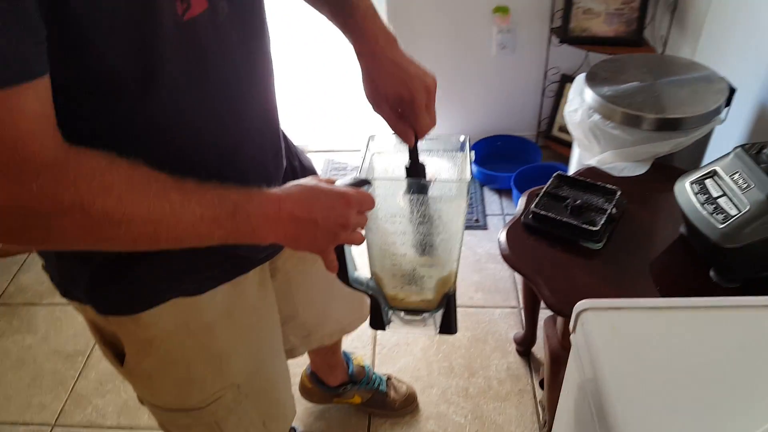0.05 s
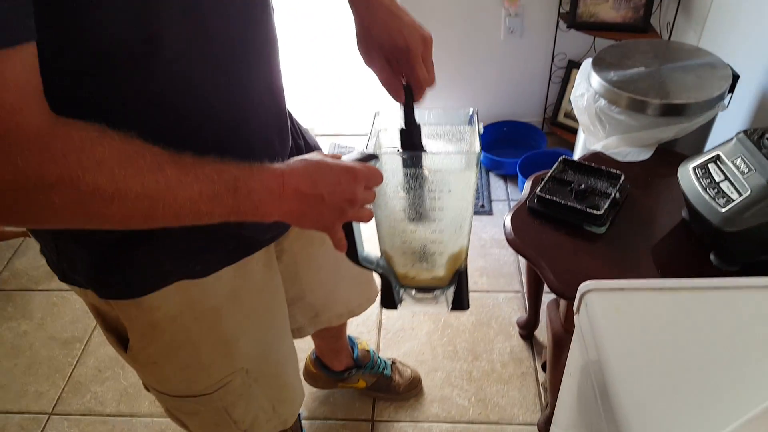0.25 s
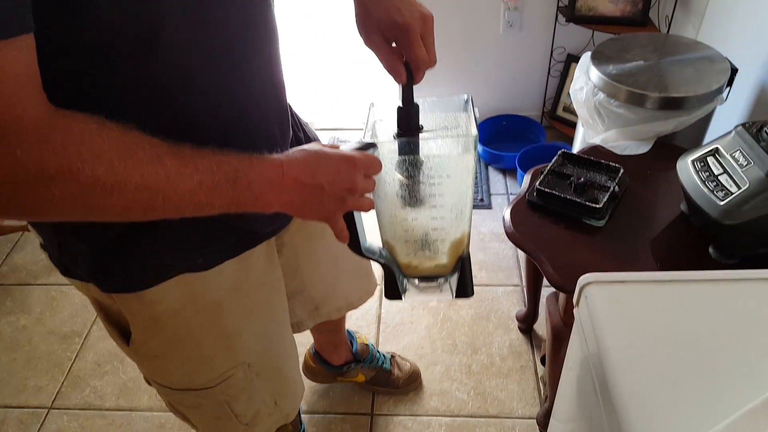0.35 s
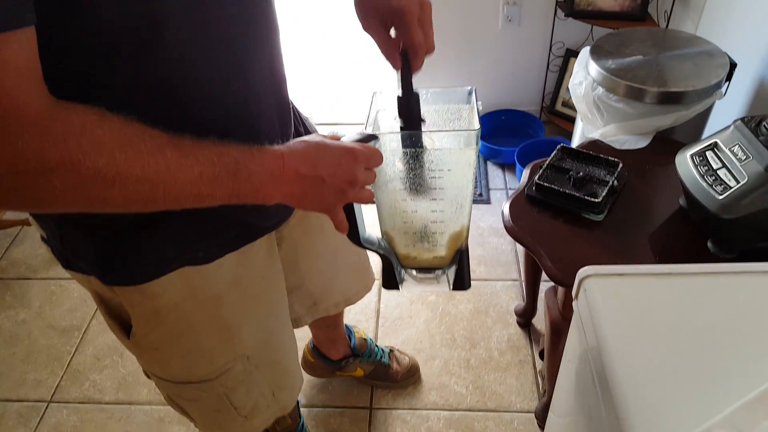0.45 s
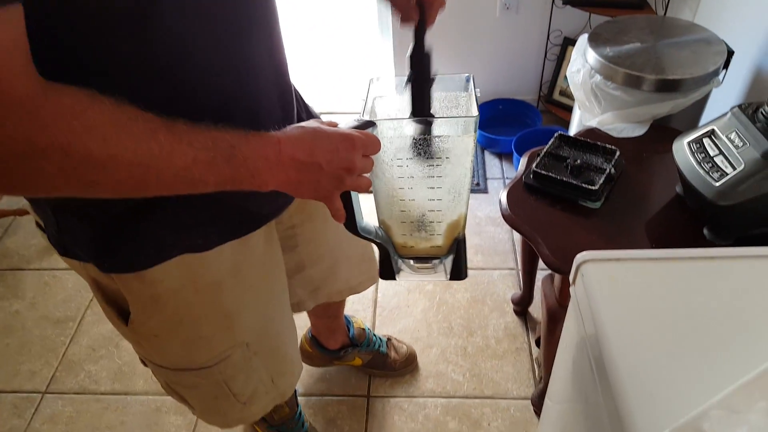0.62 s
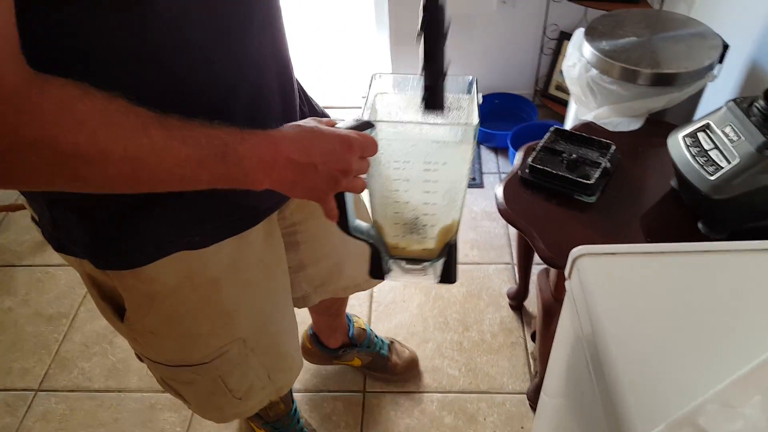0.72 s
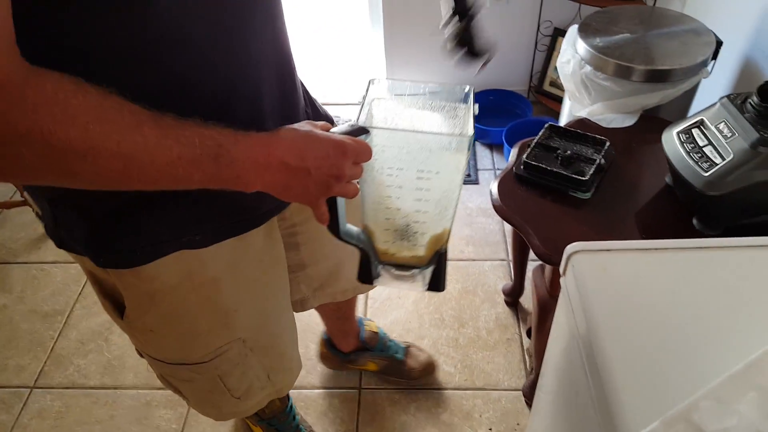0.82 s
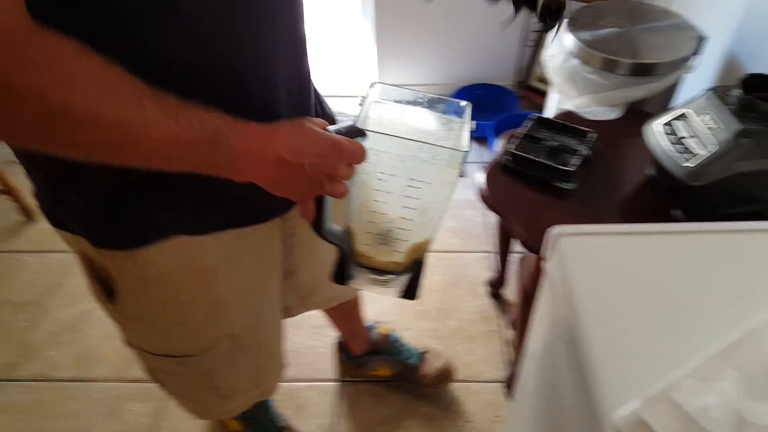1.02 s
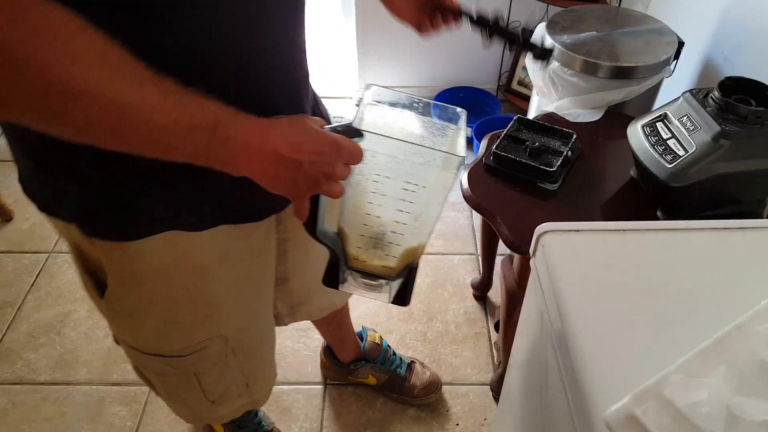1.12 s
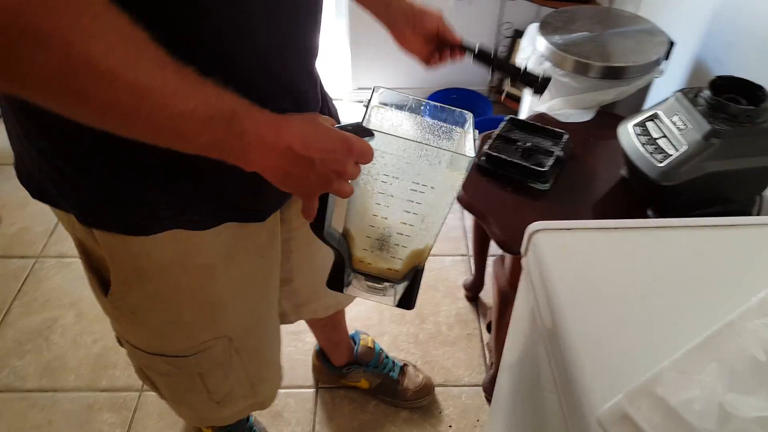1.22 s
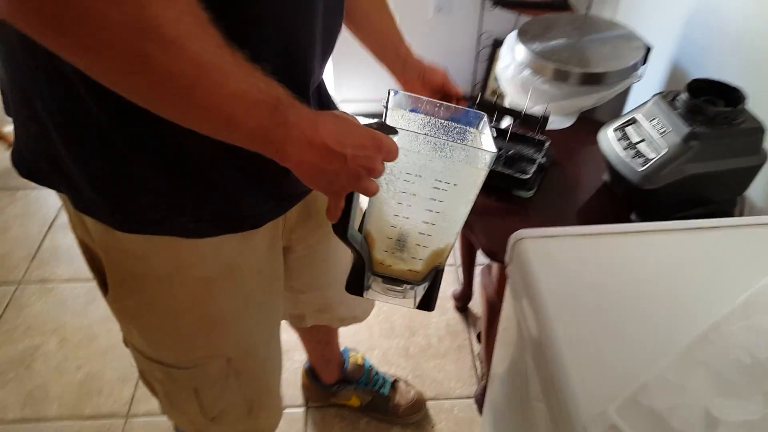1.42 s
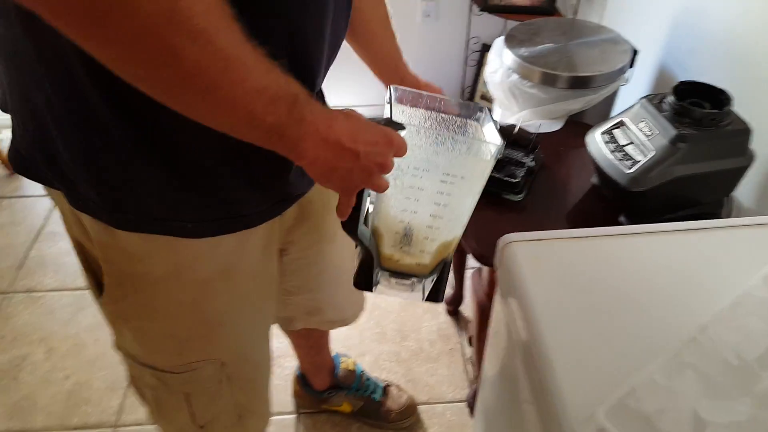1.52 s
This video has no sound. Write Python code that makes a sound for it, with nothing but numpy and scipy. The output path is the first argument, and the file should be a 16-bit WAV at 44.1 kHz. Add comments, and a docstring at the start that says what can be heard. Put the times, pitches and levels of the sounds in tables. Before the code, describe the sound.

Hollow plastic clacks as a blade shaft is pulled from a blender pitcher indoors.

```python
"""A plastic blade shaft knocks and scrapes its way up out of a blender pitcher in a tiled room.
Each contact clacks the walls and rings the hollow pitcher and the shaft; the room answers.
The arm swings the shaft aside with a faint rustle, the wet shaft hisses in the fingers,
and it touches down on a table. Dull room noise and microphone hiss lie underneath."""
import sys
import numpy as np
from scipy import signal
from scipy.fft import rfft, irfft
from scipy.io import wavfile

SR = 44100
rng = np.random.default_rng(int(sys.argv[2]) if len(sys.argv) > 2 else 0)


def unload_audio(sound):
    """Save the sound as a 16-bit wav file, at the path given as the first command line argument."""
    columns = np.transpose(np.atleast_2d(sound))
    # keep every value between -1 and 1, then stretch to whole-number steps
    steps = np.round(np.clip(columns, -1, 1) * 32767)
    wavfile.write(sys.argv[1], SR, steps.astype(np.int16))


N = 68355


def from_db(db):
    """Decibels to gain."""
    return 10 ** (np.asarray(db) / 20)


def at_hz(rows, hz):
    """Table columns interpolated over log frequency."""
    freqs, *columns = np.transpose(rows)
    return [np.interp(np.log(hz), np.log(freqs), column) for column in columns]


def envelope(rows):
    """Gain per sample from time_s, level_db rows."""
    return from_db(np.interp(np.arange(N) / SR, *np.transpose(rows)))


def pan(db):
    """Constant-power gains; db is left minus right."""
    gains = from_db(np.array([[db], [-db]]) / 2)
    return gains / np.sqrt(np.mean(gains ** 2))


def decay_per_sample(t60_s):
    """Amplitude factor that loses 60 dB in t60_s."""
    return np.exp(-np.log(1000) / (SR * t60_s))


def spread(mid, side, correlation):
    """Two independent noises to a partly correlated stereo pair."""
    return np.sqrt((1 + correlation) / 2) * mid + np.sqrt((1 - correlation) / 2) * np.array([side, -side])


# freq_hz, pan_db, correlation
STEREO_FIELD = [(100, 0, 0.89), (426, -5, 0.88), (746, -1, 0.43), (1280, -9.5, 0.17), (2950, -8.5, 0.17),
                (5740, -2, .1), (8930, -13.5, .05), (14000, 2.5, 0.07)]

def coloured_noise(spectrum):
    """Unit-rms stereo noise, coherent in the bass, diffuse in the treble."""
    hz = np.arange(N // 2 + 1) * SR / N + 1
    _, correlation = at_hz(STEREO_FIELD, hz)
    mid, side = rfft(rng.standard_normal((2, N))) * from_db(at_hz(spectrum, hz)[0])
    noise = irfft(spread(mid, side, correlation), N)
    return noise / np.std(noise)


# freq_hz, relative_db
ROOM_NOISE_SPECTRUM = [(15, -47), (25, -50), (49, -8), (108, -5), (130, -4), (197, -3.5), (319, -7.5),
                       (349, -7.5), (429, -5.5), (528, -11), (728, -16), (1000, -20.5), (1120, -24),
                       (6000, -40.5), (7800, -70), (13200, -120)]
MIC_HISS_SPECTRUM = [(1760, -36), (3000, -6), (4670, -22.5), (5040, -3), (6120, -6.5), (9280, -13.5),
                     (12800, -4), (15700, -16)]

def background(room_db=-49, hiss_db=-72.5, room_cutoff_hz=5000):
    """Steady dull room noise and microphone hiss."""
    lowpass = signal.butter(2, room_cutoff_hz, fs=SR, output="sos")
    room = signal.sosfilt(lowpass, coloured_noise(ROOM_NOISE_SPECTRUM))
    hiss = coloured_noise(MIC_HISS_SPECTRUM)
    return pan(db=-3.5) * from_db(room_db) * room + from_db(hiss_db) * hiss


# time_s, level_db
RUSTLE_LEVELS = [(0, -54.5), (0.18, -64.5), (1.08, -64.5), (1.16, -54), (1.25, -55.5), (1.33, -53.5),
                 (1.54, -58.5)]
# freq_hz, relative_db
RUSTLE_SPECTRUM = [(60, -30), (200, -0.5), (500, 3.5), (1100, -10), (1800, -9.5), (3500, -24), (6000, -30),
                   (9500, -32), (13000, -47.5), (16000, -21)]

def arm_rustle():
    """Soft noise of the moving arm and shaft."""
    return envelope(RUSTLE_LEVELS) * coloured_noise(RUSTLE_SPECTRUM)


# Shaft on pitcher; last row on the table.
# start_s, shaft_ring_db, hollow_db, clack_db, crack_db, tick_db
SHAFT_KNOCKS = [(0.2088, -56, -19, -15, -27.5, -40.5), (0.2117, -61, -14.5, -35.5, -33.5, -39),
                (0.2455, -52, -32, -15, -38, -54), (0.2830, -51, -14.5, -55, -13.5, -33),
                (0.2858, -50, -26, -14, -17, -63), (0.2985, -43, -20.5, -39, -57, -39.5),
                (0.3075, -50, -20.5, -19.5, -37, -50), (0.3280, -51, -22, -47, -30, -60),
                (0.3520, -44, -17.5, -38, -22, -47), (0.3700, -63, -28, -21.5, -28.5, -63),
                (0.3900, -64, -26.5, -18, -28, -73), (0.3950, -58, -15, -24, -66, -37.5),
                (0.4025, -56, -21, -22.5, -53, -58), (0.4115, -64, -20, -31.5, -37, -68),
                (0.5012, -16, -21, -36, -19, -36.5), (0.5040, -44, -19.5, -20, -19, -37.5),
                (0.5505, -35, -19, -27.5, -21.5, -36), (0.6185, -44, -28, -24, -29.5, -82),
                (0.6222, -49, -27, -27, -48, -78), (0.6855, -61, -39, -48, -48, -52.5),
                (1.5463, -41, -30, -31.5, -41.5, -43)]
# time_s, level_db
SCRAPE_LEVELS = [(0.215, 4), (0.27, -7), (0.30, -0.5), (0.37, 1.5), (0.41, -1), (0.44, -50), (0.49, -20)]
# shaft_ring_db, hollow_db, clack_db, crack_db, tick_db
SLIP_OFFSETS = (-64, -37, -35, -42, -54)

def contacts(slips_per_s=170, spread_db=6.5):
    """Knocks plus random slips of the shaft along the wall, as SHAFT_KNOCKS rows."""
    start_s, end_s = SCRAPE_LEVELS[0][0], SCRAPE_LEVELS[-1][0]
    jitter, strength = rng.random((200, 2)).T
    times_s = start_s + (np.arange(len(jitter)) + jitter) / slips_per_s
    level_db = np.interp(times_s, *np.transpose(SCRAPE_LEVELS)) + spread_db * (2 * strength - 1)
    slips = np.column_stack([times_s, level_db[:, None] + np.array(SLIP_OFFSETS)])
    return np.vstack([SHAFT_KNOCKS, slips[times_s < end_s]])


def clicks(times_s, db):
    """Impulse train."""
    return np.bincount((times_s * SR).astype(int), from_db(db), N)


# hollow_hz, clack_hz, crack_hz, tick_hz
CONTACT_BANDS = (400, 900, 2200, 4800)

def force(hits, hz):
    """One impulse per contact, at its strength for this frequency."""
    levels_db = [np.interp(np.log(hz), np.log(CONTACT_BANDS), colour) for colour in hits[:, 2:]]
    return clicks(hits[:, 0], levels_db)


def resonate(drive, hz, radius):
    """Two-pole resonator with zeros at DC and Nyquist."""
    poles = [1, -2 * radius * np.cos(2 * np.pi * hz / SR), radius ** 2]
    return signal.lfilter([0.5, 0, -0.5], poles, drive + 1e-18)


def ring(drive, hz, db, t60_s, pan_db):
    """One struck, panned mode."""
    return from_db(db) * pan(pan_db) * resonate(drive, hz, decay_per_sample(t60_s))


# freq_hz, relative_db, t60_s, pan_db
PITCHER_MODES = [(361.8, -2.5, 0.28, -7), (381.7, -15, 0.35, -9), (445, -49, 0.12, -21),
                 (492.3, -11.5, 0.75, -1), (506, -12, 0.64, -19), (688.6, -5.5, 0.52, 0.5),
                 (714.7, -11.5, 0.3, 15), (824.7, -11, 0.27, -1), (904, -6.5, 0.33, -18),
                 (975, -45, 0.14, -11), (1063, -29, 0.22, -13), (1350.6, -10.5, 0.25, -17),
                 (1429, -21, 0.25, 10), (2202, -21, 0.033, -28)]
BLADE_SHAFT_MODES = [(1692, -42, .38, -20), (1777, -11, 0.43, -35), (2276, -32, .05, -23),
                     (2949, 2, 0.1, -9), (2980, -7.5, 0.3, -9.5), (3050, -11.5, 0.26, -10),
                     (3100, -17, 0.55, -32)]

def ringing(hits, pitcher_gain_db=-3, shaft_gain_db=-6, cutoff_hz=3150):
    """Contacts ring the pitcher with its air column, and the brighter shaft with its blades."""
    pitcher = sum(ring(force(hits, mode[0]), *mode) for mode in PITCHER_MODES)
    shaft_drive = clicks(hits[:, 0], hits[:, 1])
    shaft = sum(ring(shaft_drive, *mode) for mode in BLADE_SHAFT_MODES)
    lowpass = signal.butter(2, cutoff_hz, fs=SR, output="sos")
    return signal.sosfilt(lowpass, from_db(pitcher_gain_db) * pitcher + from_db(shaft_gain_db) * shaft)


def stored(energy, t60_s):
    """Energy fed in and decaying exponentially."""
    return signal.lfilter([1], [1, -decay_per_sample(t60_s) ** 2], energy + 1e-18)


# Dense pitcher wall modes: freq_hz, level_db, t60_s
WALL_BANDS = [(130, -28, 0.051), (238, -26, 0.03), (385, -13, 0.069), (574, -5, 0.026), (956, -13.5, 0.051),
              (1640, -2.5, 0.026), (2000, -8, 0.042), (2320, -4.5, 0.053), (2860, -5.5, 0.01),
              (3940, -3.5, 0.01), (5200, -8, 0.031), (7080, -5, 0.027), (10000, -8, 0.023),
              (13000, -3, 0.04), (16000, -13, 0.021)]
# Reverberation: freq_hz, level_re_wall_db, t60_s
ROOM_BANDS = [(151, -8, 0.13), (445, -11.5, 0.54), (650, -12, 0.57), (1300, -12, 0.4), (2950, -15, 0.47),
              (7050, -13.5, 0.51), (13100, -15.5, 0.47)]

def wall_clatter(hits, build_s=0.0036, house_db=-15, house_t60_s=0.86):
    """Short clacks of the walls, a room tail and a weaker, longer tail from the rest of the house."""
    edges_hz = 140 * 2 ** (np.arange(22) / 3)
    build = np.exp(-1 / (SR * build_s))
    clatter = 0
    for low, high in zip(edges_hz, edges_hz[1:]):
        hz = np.sqrt(low * high)
        wall_db, wall_t60_s = at_hz(WALL_BANDS, hz)
        room_db, room_t60_s = at_hz(ROOM_BANDS, hz)
        pan_db, correlation = at_hz(STEREO_FIELD, hz)
        energy = force(hits, hz) ** 2
        reverb = stored(energy, room_t60_s) + from_db(house_db) ** 2 * stored(energy, house_t60_s)
        tail = signal.lfilter([1 - build], [1, -build], reverb) * from_db(room_db) ** 2
        noise = spread(*rng.standard_normal((2, N)), correlation)
        burst = np.sqrt(stored(energy, wall_t60_s) + tail) * noise
        bandpass = signal.butter(2, [low, high], "band", fs=SR, output="sos")
        band_share = 2 * (high - low) / SR
        clatter += from_db(wall_db) * pan(pan_db) * signal.sosfilt(bandpass, burst) / np.sqrt(band_share)
    return clatter


def mode_colouring(clatter, gain_db=2.5, width_hz=24.4):
    """Clatter and tail take on the pitches of pitcher and shaft."""
    radius = np.exp(-np.pi * width_hz / SR)
    peaks = sum(resonate(clatter, hz, radius) for hz, *_ in PITCHER_MODES + BLADE_SHAFT_MODES)
    return clatter + from_db(gain_db) * (1 - radius ** 2) * peaks


# time_s, level_db
SLIDE_LEVELS = [(1.1, -101), (1.19, -65), (1.235, -69.5), (1.252, -56.5), (1.275, -64), (1.36, -77)]
# freq_hz, relative_db
SLIDE_SPECTRUM = [(1500, -1), (3800, 6), (5500, -7), (9500, -8), (12500, 3), (16000, -6.5)]

def finger_slide():
    """Fine hiss of the wet shaft sliding in the fingers."""
    return envelope(SLIDE_LEVELS) * coloured_noise(SLIDE_SPECTRUM)


def scene():
    """Struck pitcher and shaft over quiet handling and background."""
    hits = contacts()
    impacts = ringing(hits) + mode_colouring(wall_clatter(hits))
    handling = pan(db=-9) * (arm_rustle() + finger_slide())
    return impacts + handling + background()


# centre_hz, width_hz, depth_fraction
TREBLE_DIPS = [(5170, 1740, 0.37), (9500, 1700, 0.19)]

def record(dry, cutoff_hz=16000):
    """Microphone: treble dips, soft clipping, steep low-pass."""
    for hz, width_hz, depth in TREBLE_DIPS:
        dry = dry - depth * signal.lfilter(*signal.iirpeak(hz, hz / width_hz, fs=SR), dry)
    rounded = dry / (1 + dry ** 4) ** 0.25
    lowpass = signal.ellip(10, 0.2, 80, cutoff_hz, fs=SR, output="sos")
    return signal.sosfilt(lowpass, rounded)


dry = scene()
out = record(dry)
unload_audio(out)
```